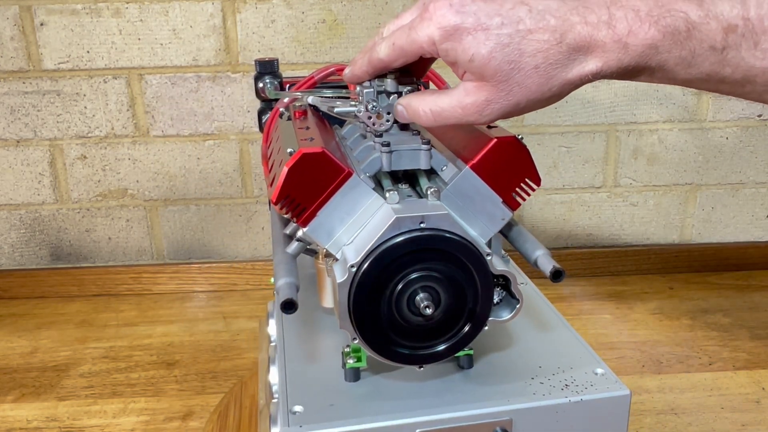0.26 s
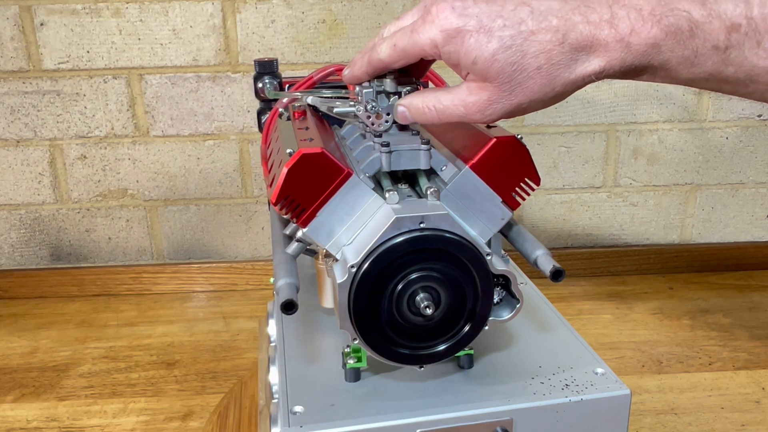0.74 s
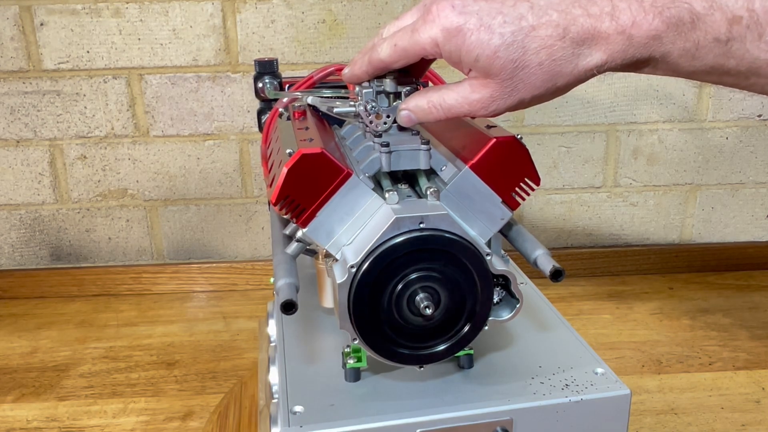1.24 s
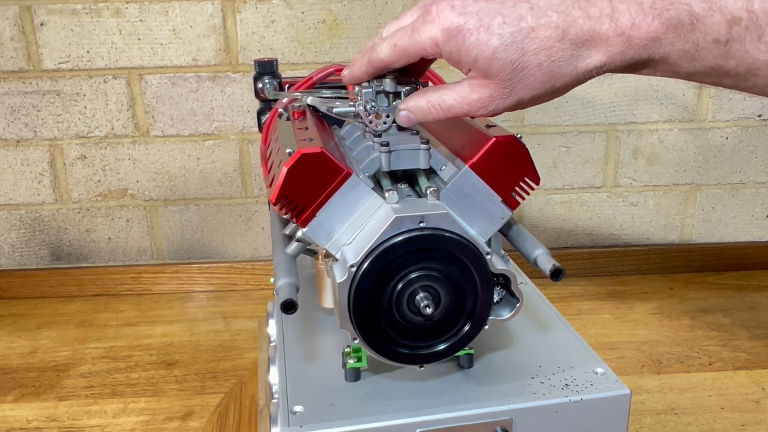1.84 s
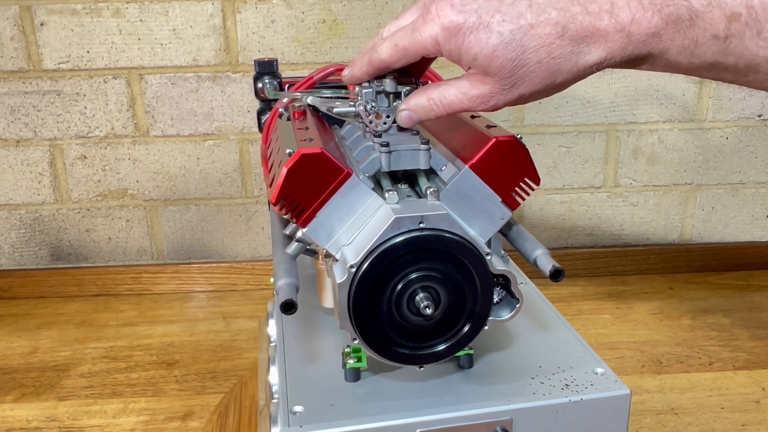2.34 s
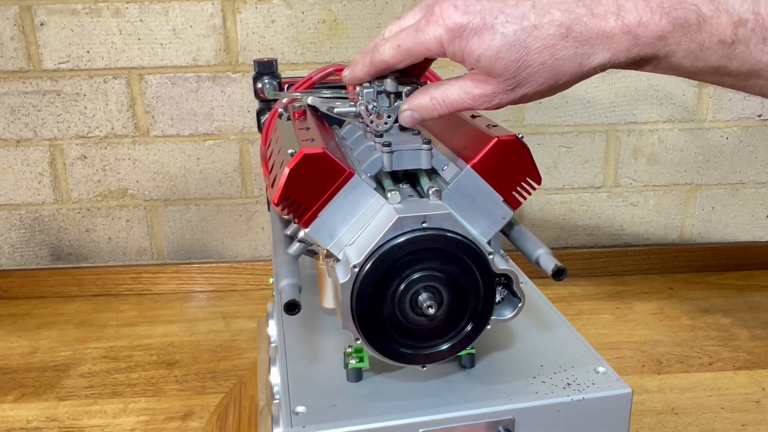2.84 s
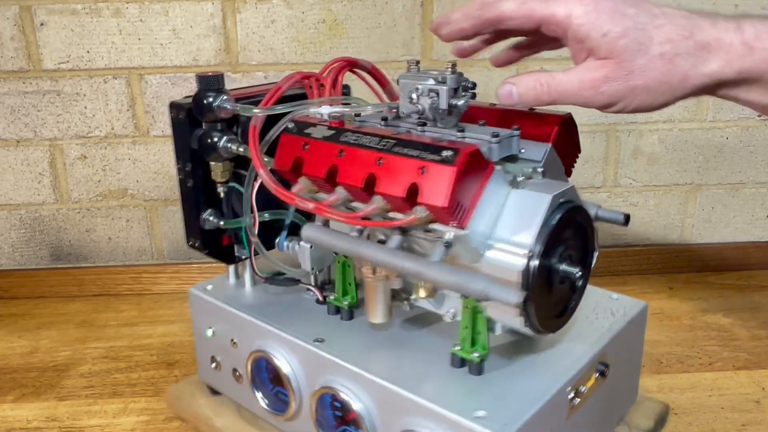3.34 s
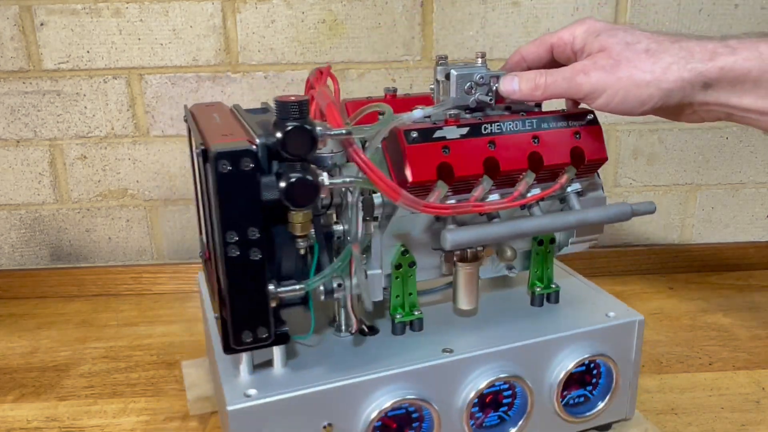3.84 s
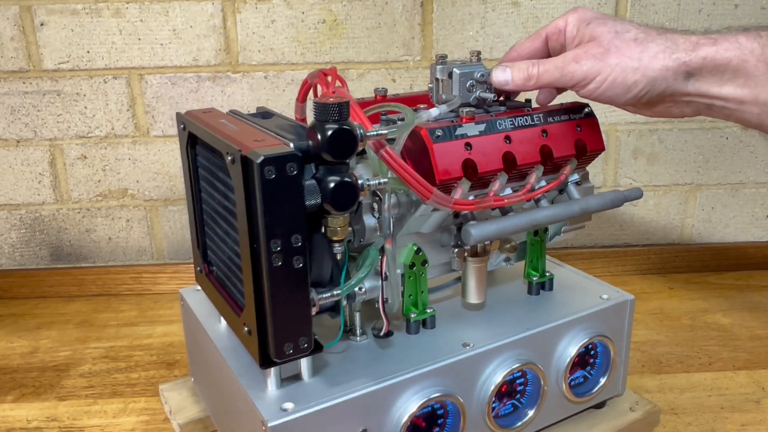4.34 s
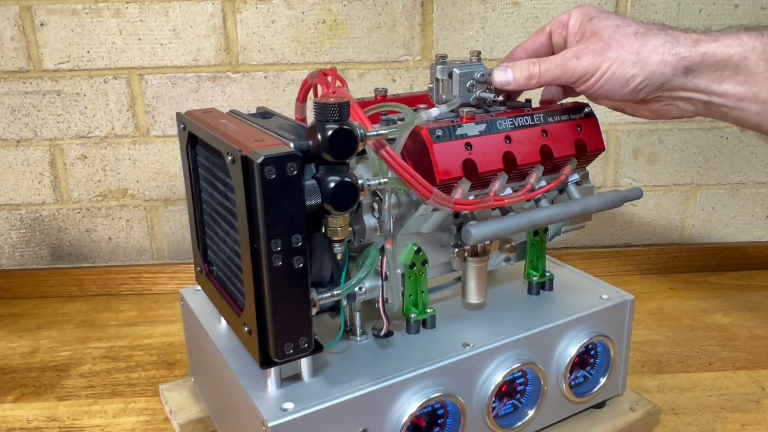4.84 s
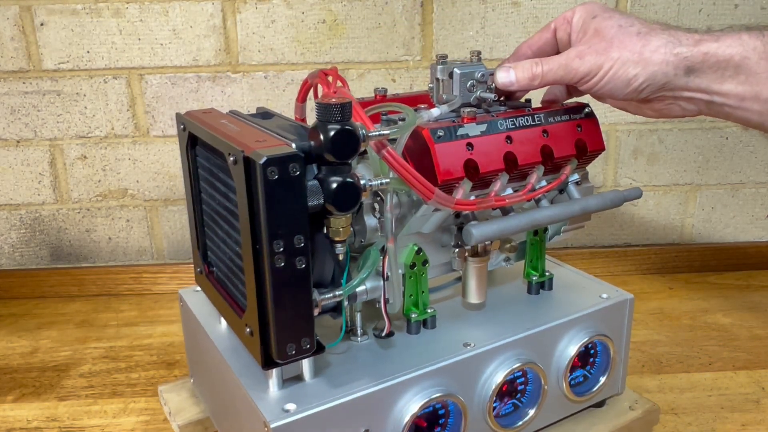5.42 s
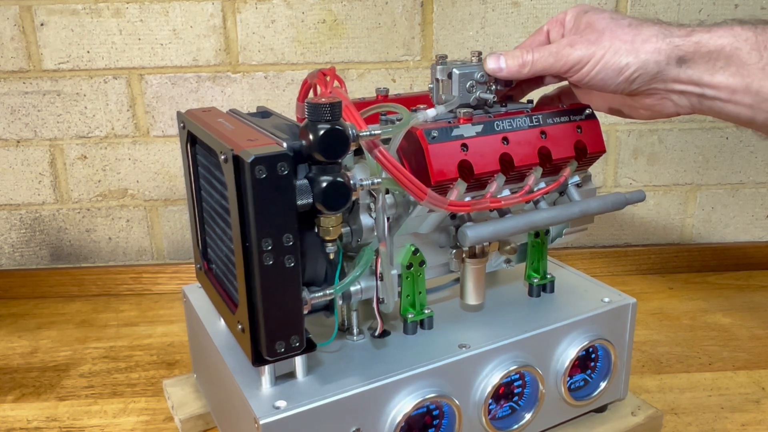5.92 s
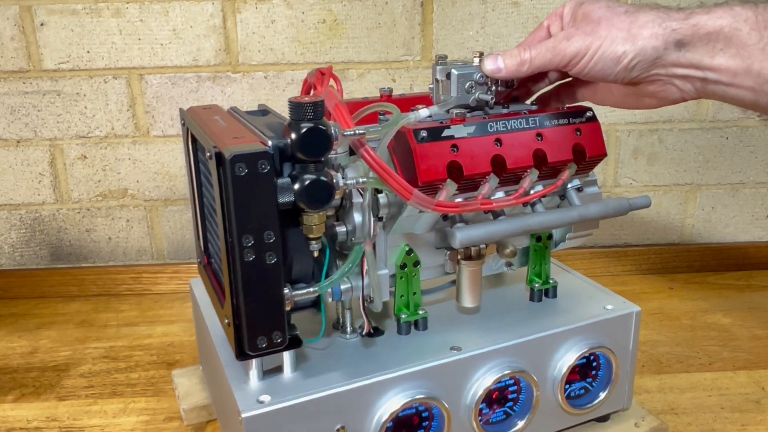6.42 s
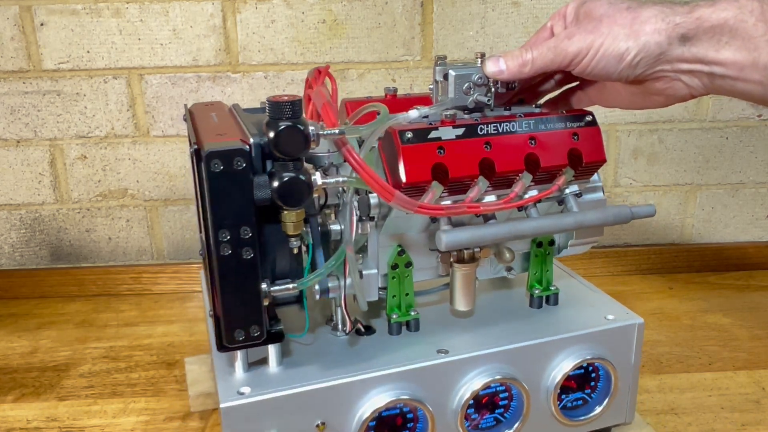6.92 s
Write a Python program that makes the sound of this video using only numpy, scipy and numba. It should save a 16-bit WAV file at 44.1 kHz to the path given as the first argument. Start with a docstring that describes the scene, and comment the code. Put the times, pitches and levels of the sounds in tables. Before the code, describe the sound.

Small brick room, phone very close to a model V8 on a metal stand. From 0 s the engine catches with hard dry cracks, hissing gas, hollow pipe thumps around 200-350 Hz and metallic ringing. A blip at 0.15-0.3 s shoots up and its clean tone slides down; another, densest in cracks, peaks near 0.73 s with a low thud around 0.8. From 1 to 1.9 s it misfires in short, weaker bursts. A lower rev swells at 1.9-2.2 s, then uneven putters fade until the stall at about 3.4 s. A soft rustle of the turning stand lasts to about 4.1 s over a very quiet, steady pump whine and faint air noise. At 4.9 s a bright starter rasp lasts about a tenth of a second; the engine refires, revving sharply at 5.15-5.3 s and falling. Exhaust now sounds blurred and softer; a smaller rev peaks near 6 s, then quick irregular puttering continues to the end, about 7.2 s.

```python
"""A scale-model V8 hunts and misfires on a metal stand in a small brick room, close to a phone.
Short runs of firings: each is a noise crack of gas, a pressure pop, a thump in the resonant pipes and a metal ring.
Between runs the strokes only pump air through the same pipes, and clean tones fall after throttle blips.
It stalls, leaving a small coolant pump whining in stacked sines over a soft rustle of the turning stand and
faint air noise, until a starter rasps in filtered noise and the engine turns again."""
import sys
import numpy as np
from scipy import signal
from scipy.fft import rfft, irfft, next_fast_len
from scipy.io import wavfile
from scipy.ndimage import uniform_filter1d
from numba import njit

SR = 44100
rng = np.random.default_rng(int(sys.argv[2]) if len(sys.argv) > 2 else 0)


def wav_out(sig):
    """Save sig, one row per channel (or a flat mono array), as 16-bit PCM at SR to the path in sys.argv[1]."""
    wavfile.write(sys.argv[1], SR, np.round(np.clip(np.atleast_2d(sig).T, -1, 1) * 32767).astype(np.int16))


N = 316197

# The pipes face the phone until this moment in seconds, then point away; paired settings are (facing, turned).
TURN_S = 4.
FACING = np.arange(N) < TURN_S * SR

# Resonances of the exhaust pipes. Each row: centre in Hz, width in Hz, relative level in dB.
PIPE = [(139.9, 43, -5), (190.7, 25, -0.5), (262, 45, 5.5), (341.6, 77.5, -0.5), (463.3, 72, -8.5),
        (760, 280, -10)]
# Resonances of the metal stand. Each row: centre in Hz, width in Hz, relative level in dB.
STAND = [(50, 2.8, -3.5), (97.5, 24, -6.5)]
# Runs in which the cylinders catch. Each row: start in seconds, length in seconds, relative level of the gas in dB,
# relative level of the pipes in dB, swell over the run in dB.
RUNS = [(0.0, 0.038, -47, -42.5, -5), (0.161, 0.11, -13, -17, 15.5), (0.574, 0.054, -25, -23.5, 4),
        (0.652, 0.064, -17.5, -16, 9.5), (0.716, 0.079, -19, -19, 6), (0.877, 0.089, -33, -27.5, -2.5),
        (1.002, 0.048, -37, -26.5, 3), (1.066, 0.036, -21, -23, 8), (1.151, 0.033, -34.5, -28, -1.5),
        (1.22, 0.074, -35.5, -31.5, -1.5), (1.355, 0.044, -30, -30, -2.5), (1.485, 0.044, -25, -28, -1),
        (1.569, 0.07, -30.5, -27.5, 0), (1.669, 0.049, -25, -25.5, 4.5), (1.769, 0.071, -32, -27.5, 3.5),
        (1.888, 0.251, -20.5, -20, 7.5), (2.165, 0.013, -15, -19.5, 10), (2.376, 0.033, -29, -26, 2),
        (2.497, 0.043, -32.5, -26.5, 0.5), (2.618, 0.054, -29, -26.5, 6.5), (2.762, 0.063, -31, -25, 4.5),
        (2.949, 0.043, -29, -23.5, 5), (3.099, 0.06, -38.5, -29.5, -0.5), (3.194, 0.019, -46, -36.5, -6.5),
        (3.271, 0.063, -41, -28.5, 1.5), (5.02, 0.058, -30.5, -26, 6.5), (5.156, 0.105, -22, -19, 7),
        (5.59, 0.04, -33, -29, 3), (5.757, 0.055, -35.5, -26.5, -1), (5.873, 0.023, -39, -33, -4.5),
        (5.936, 0.057, -36, -30.5, -1), (6.111, 0.063, -40.5, -30, 0.5), (6.19, 0.023, -36, -27.5, 1.5),
        (6.252, 0.039, -38.5, -30, 7.5), (6.305, 0.065, -34, -24.5, 3), (6.415, 0.06, -35, -22, 9),
        (6.56, 0.029, -27, -23, 11), (6.649, 0.068, -32, -27.5, 9), (6.746, 0.073, -34, -26, 2),
        (6.847, 0.055, -31, -24, 6), (6.934, 0.076, -40, -29, 0), (7.056, 0.056, -34.5, -28, -0.5),
        (7.16, 0.011, -25, -28.5, 9.5)]
# Extra level of the gas's high band. Each row: time in seconds, level in dB.
CRACK_TREBLE = [(0, -7.5), (1.0, 0.5), (2.2, -1.5), (3.0, 6), (3.4, 6.5), (5.0, 3.5), (5.5, -8), (5.8, 4),
                (7.17, 1.5)]


def undb(db):
    """Decibels to amplitude."""
    return 10 ** (np.asarray(db) / 20)


def unit(x):
    """Scale to an RMS of 1."""
    return x / np.sqrt(np.mean(x ** 2))


def curve(table):
    """Columns of a table that starts with seconds, joined by straight lines at every sample."""
    s, *columns = np.transpose(table)
    return [np.interp(np.arange(N) / SR, s, c) for c in columns]


def colour(x, points):
    """Equalise by (Hz, dB) points joined on a log frequency axis."""
    size = next_fast_len(x.shape[-1])
    hz, db = np.transpose(points)
    gain = undb(np.interp(np.log(np.fft.rfftfreq(size, 1 / SR) + 1), np.log(hz), db))
    return irfft(rfft(x, size) * gain, size)[..., :x.shape[-1]]


def ring(x, modes):
    """Sum of resonances, neighbours in opposite phase."""
    return sum((-1) ** k * undb(db) * signal.lfilter(*signal.iirpeak(hz, hz / width, SR), x)
               for k, (hz, width, db) in enumerate(modes))


def highpass(x, order, hz):
    """Butterworth low cut."""
    return signal.sosfilt(signal.butter(order, hz, "high", fs=SR, output="sos"), x)


def spikes(s, size):
    """Single-sample impulses at the given seconds."""
    out = np.zeros(N)
    np.add.at(out, np.clip((s * SR).astype(int), 0, N - 1), size)
    return out


def puff(x, rise_s, fall_s):
    """Turn every spike into a rounded rise and an exponential fall, peaking at the spike's size."""
    t = np.arange(SR // 10) / SR
    shape = (1 - np.exp(-t / rise_s)) ** 2 * np.exp(-t / fall_s)
    return signal.fftconvolve(x, shape / shape.max())[:N]


def walk(rate):
    """Random levels, one every 1 / rate seconds, joined by ramps; spread a little under 1."""
    k = int(SR / rate)
    held = np.repeat(rng.standard_normal(N // k + 1), k)
    return uniform_filter1d(held, k)[:N]


def engine():
    """Pumping strokes and firings share the pipes, gas escapes as noise, and the block shakes the stand."""
    # Pipes and gas between the runs. Each row: time in seconds, pumping in the pipes in dB, gas and valve hiss in dB.
    coasting = [(0.04, -58, -69), (0.14, -43.5, -54), (0.31, -31, -35), (0.55, -35, -44.5),
                (0.85, -32, -40.5), (1.14, -35, -57), (1.46, -33.5, -47), (1.86, -38.5, -54.5),
                (2.21, -28.5, -40), (2.48, -35.5, -53), (2.7, -37, -55.5), (2.93, -40, -60),
                (3.07, -37, -62.5), (3.38, -38.5, -54), (3.45, -66.5, -46), (3.9, -79, -55.5),
                (4.92, -68.5, -51.5), (4.95, -47, -57), (5.0, -39.5, -40.5), (5.13, -31, -37.5),
                (5.31, -27.5, -32.5), (5.56, -35, -39.5), (5.72, -39.5, -44), (6.0, -29, -45),
                (6.25, -45, -61), (6.4, -33, -45), (6.8, -30, -45.5), (7.17, -32, -43)]
    still = [(4.15, -120, -120), (4.9, -120, -120)]
    coast_db, leak_db = curve(sorted(coasting + still))

    # steady part of a run against its listed levels, and how fast it dies
    run_pumping_db, run_hiss_db = (-6, -5), (-7.5, -1.5)
    gas_fall_db_s, pipes_fall_db_s = 701, 297
    gas_db = runs(np.transpose(RUNS)[2], gas_fall_db_s)
    pipes_db = runs(np.transpose(RUNS)[3], pipes_fall_db_s)
    pump_level = np.hypot(undb(coast_db), undb(pipes_db + np.where(FACING, *run_pumping_db)))
    hiss_level = np.hypot(undb(leak_db), undb(gas_db + np.where(FACING, *run_hiss_db)))

    stroke, times, hz = strokes()
    s, crack_db, thump_db = firings(times, hz, pipes_db)
    # hiss and overtone die as the crank slows to a stop
    turning = np.clip(speed()[0] / 100, 0, 1) ** 4
    hiss = gas_hiss(stroke, hiss_level * turning)
    pumped = (pumping(stroke, turning) + coast_tones()) * pump_level
    shaken = shake(stroke) * uniform_filter1d(pump_level, size=SR // 10)
    escaping = gas(np.hypot(cracks(s, crack_db), hiss))
    mono = pumped + thumps(s, thump_db) + shaken + rock() + jolts() + metal(s, crack_db, hiss[0]) + pops(s, crack_db)
    return mono + escaping


def speed():
    """Strokes a second, roughness and share of clean tone: idle, or a blip that climbs and sags at a steady rate."""
    # Idle of all eight cylinders. Each row: time in seconds, exhaust strokes in Hz before random surges, roughness in dB.
    idle = [(0, 116.3, 6), (.56, 138.8, 4), (.9, 188.2, 5), (1.88, 130.8, 5.5), (2.35, 139.5, 4),
            (3.3, 120.4, 4), (3.45, 50.75, 2), (4.9, 45.04, 3), (4.98, 109.6, 3), (5.15, 149.6, 4.5),
            (5.56, 105, 4), (5.75, 110.9, 4), (6.1, 139.6, 4), (6.4, 199.4, 4), (7.17, 186.3, 4.5)]
    # Throttle blips. Each row: opens in seconds, top reached in seconds, closes in seconds, top strokes in Hz,
    # roughness while open in dB, roughness once shut in dB, clean tones once shut in dB.
    revs = [(.14, .28, .305, 400, 3, 2.5, 0), (.56, .73, .73, 362, 6, 4, -20),
            (1.88, 2.1, 2.2, 255, 5, 4, -12), (5.15, 5.26, 5.27, 400, 5, 3, 0),
            (5.75, 5.97, 5.97, 258, 5.5, 4, -12)]
    sag_hz_per_s = 1050
    t = np.arange(N) / SR
    hz, rough_db = curve(idle)
    smooth = np.zeros(N)
    for opens, top, closes, top_hz, blip_db, sag_db, clean_db in revs:
        climb = np.interp(t, [opens, top], [hz[int(opens * SR)], top_hz])
        blip = climb - sag_hz_per_s * np.maximum(t - closes, 0)
        on = (t > opens) & (blip > hz)
        shut = t > closes
        hz = np.where(on, blip, hz)
        rough_db = np.where(on, np.where(shut, sag_db, blip_db), rough_db)
        smooth = np.where(on & shut, undb(clean_db), smooth)
    return hz, rough_db, smooth


def strokes():
    """A spike at every exhaust stroke; the rougher the running, the more cylinders, sizes and timing differ."""
    # Uneven banks, one cylinder after another in firing order. Each value: a share of the roughness.
    cylinder_shares = [-0.54, -0.2, -0.08, 0.5, 0.06, -3.5, -0.14, -1.22]
    hz, rough_db, _ = speed()
    hz = hz * (1 + .004 * rough_db * rough_db * walk(14))  # misfires make the speed surge and sag
    at = np.flatnonzero(np.diff(np.floor(np.cumsum(hz) / SR)))
    chance = np.clip(rng.standard_normal((N // 50, 2))[:len(at)].T, -1.7, 1.7)
    size_db = rough_db[at] * (np.resize(cylinder_shares, len(at)) + chance[0])
    s = at / SR + .007 * rough_db[at] ** 2 * chance[1] / hz[at]
    # quicker strokes overlap, so each is smaller for the same loudness
    return spikes(s, undb(size_db) / np.sqrt(hz[at])), s, hz[at]


def runs(level_db, fall_db_s):
    """Level in dB of the strongest run: on at once, swelling, then falling away."""
    t = np.arange(0, N / SR, .001)[:, None]
    start, length, *_, swell_db = np.transpose(RUNS)
    swelling = swell_db * np.maximum(1 - (t - start) / length, 0)
    falling = fall_db_s * np.maximum(t - start - length, 0)
    db = np.maximum(level_db - swelling - falling, -120)
    db = np.where(t < start, -120, db).max(axis=1)
    return np.interp(np.arange(N) / SR, t[:, 0], db)


def firings(s, hz, pipes_db):
    """Times, crack dB and thump dB: a run opens with a firing, strokes fire unevenly; single firings are listed."""
    # Single firings at set times, loud and soft. Each row: time in seconds, relative level of the gas crack in dB.
    single_firings = [(.238, -6), (.257, -7.5), (.275, -11.5), (0.294, -6), (0.587, -17.5), (0.669, -9.5),
                      (0.6999, -13.5), (0.7212, -10.5), (0.723, -6.5), (0.741, -12.5), (0.7588, -5),
                      (0.7642, -8), (0.781, -9), (0.7995, -5.5), (0.8247, -9), (0.8743, -14),
                      (0.898, -15.5), (0.91, -22.5), (0.9262, -17.5), (.9514, -19.5), (0.9347, -12),
                      (0.965, -16.5), (0.977, -17), (1.0073, -16.5), (1.016, -12.5), (1.0412, -16.5),
                      (1.083, -18), (1.096, -16.5), (1.105, -19.5), (1.1655, -13.5), (1.2222, -23.5),
                      (1.2637, -16.5), (1.288, -28.5), (1.378, -24), (1.486, -20), (1.4975, -19),
                      (1.5182, -16.5), (1.573, -15.5), (1.5797, -23), (1.633, -27), (1.6725, -20.5),
                      (1.695, -15), (1.773, -18.5), (1.8, -25.5), (1.8194, -13.5), (1.9002, -29),
                      (1.9177, -24.5), (1.923, -15.5), (1.9761, -15.5), (2.005, -9), (2.0455, -10),
                      (2.0524, -14.5), (2.0897, -16.5), (2.1048, -15.5), (2.123, -7.5), (2.175, -9),
                      (2.1851, -11), (2.3858, -21.5), (2.4043, -22), (2.5016, -24), (2.519, -20),
                      (2.5331, -22), (2.5875, -31), (2.6277, -23), (2.645, -28), (2.6511, -21.5),
                      (2.659, -22), (2.6716, -22), (2.7387, -35.5), (2.773, -23.5), (2.7923, -19.5),
                      (2.8045, -20), (2.8177, -22), (2.97, -26), (2.9786, -15.5), (2.9962, -25.5),
                      (3.0805, -34.5), (3.112, -24.5), (3.1387, -29.5), (3.148, -24), (3.191, -35),
                      (3.208, -29), (3.235, -36.5), (3.276, -34), (3.2933, -23.5), (3.312, -21),
                      (3.321, -36), (3.329, -25), (5.034, -24.5), (5.0443, -27.5), (5.0654, -30.5),
                      (5.08, -33), (5.091, -26), (5.219, -18.5), (5.616, -30), (5.7776, -25.5),
                      (5.7888, -25), (5.9459, -22), (5.9562, -28.5), (5.985, -21), (6.146, -30.5),
                      (6.2023, -30), (6.2859, -34.5), (6.3557, -21.5), (6.4254, -25), (6.466, -20),
                      (6.5403, -31.5), (6.5846, -25.5), (6.652, -29.5), (6.6953, -17.5), (6.756, -26.5),
                      (6.787, -22.5), (6.794, -25.5), (6.8511, -26.5), (6.8808, -27), (6.942, -20),
                      (6.9547, -25.5), (6.985, -23), (7.0576, -27), (7.0758, -45), (7.103, -22.5),
                      (7.1663, -18)]
    crack_boost_db, thump_boost_db, first_db, single_thump_db = 11, 6.5, -5.5, 5.5
    first_lag_s = .001
    # random cracks fall short of their run's full level by a random amount, thumps vary less
    scatter_db, thump_scatter_db = 6, 2
    firing_share = (.45, .1)  # share of the strokes heard to crack
    start, length, gas_db, run_db, swell_db = np.transpose(RUNS)
    single, single_db = np.transpose(single_firings)
    listed = np.append(start + first_lag_s, single)

    inside = (s[:, None] > start) & (s[:, None] < start + length)
    fires = rng.random(N // 50)[:len(s)] < np.where(s < TURN_S, *firing_share)
    # strokes within 4 ms of a listed firing give way to it
    free = inside.any(axis=1) & (np.abs(s[:, None] - listed).min(axis=1) > .004)
    short_db = scatter_db * rng.exponential(size=N // 50)[:len(s)]
    vary_db = thump_scatter_db * rng.standard_normal(N // 50)[:len(s)]
    swell = (inside * swell_db * ((s[:, None] - start) / length - 1)).sum(axis=1)
    swell = swell - 10 * np.log10(hz / 130)  # quicker strokes are smaller
    which = inside.argmax(axis=1)
    crack_db = np.where(free & fires, gas_db[which] + crack_boost_db + swell - short_db, -120)
    thump_db = np.where(free, run_db[which] + thump_boost_db + swell + vary_db, -120)

    first_crack_db = gas_db - swell_db + first_db
    first_thump_db = run_db - swell_db + thump_boost_db
    single_thumps = pipes_db[(single * SR).astype(int)] + single_thump_db
    return (np.append(listed, s), np.concatenate([first_crack_db, single_db, crack_db]),
            np.concatenate([first_thump_db, single_thumps, thump_db]))


def cracks(s, crack_db):
    """Envelopes of the gas jets, low band to high; pointing away they come round the block, blurred."""
    tint_db = 3. * rng.standard_normal((N // 50, 3))[:len(s)]  # each crack has its own colour
    tint_db[:, 2] += np.interp(s, *np.transpose(CRACK_TREBLE))
    out = []
    for db in tint_db.T:
        jets = spikes(s - .0012, undb(crack_db - 6.0 + db))
        sharp = puff(jets, .002, .0008)
        blurred = undb(-3) * puff(jets, .003, .0034)
        tail = undb(-17.5) * puff(jets, 0.024, 0.0031)
        out.append(np.where(FACING, sharp, blurred) + tail)
    return out


def gas_hiss(stroke, level):
    """Envelopes of the leaking gas in three bands, gusting with every stroke and flickering at random."""
    gust = stroke ** .5
    gusts = np.where(FACING, unit(puff(gust, .0007, .001)), unit(puff(gust, .002, .003)))
    hiss = unit(0.86 + gusts) * level * undb(0.61 * walk(40))
    return np.array([hiss, hiss, hiss * undb(curve(CRACK_TREBLE)[0])])


def gas(envelopes):
    """Turbulent noise in three bands, coloured by where the pipes point; the two banks differ left to right."""
    # Colour of the gas while the pipes face the phone. Each row: frequency in Hz, density in dB per Hz.
    facing_colour = [(290, -2.5), (500, -4.5), (1890, -11.5), (3670, -16), (8130, -10), (10100, -7.5),
                     (11700, -5.5), (13700, -9), (15800, -13)]
    # Colour once they point away. Each row: frequency in Hz, density in dB per Hz.
    turned_colour = [(290, 11), (500, 0.5), (1420, 0), (2800, -6), (3900, -9.5), (6000, -9), (8610, -0.5),
                     (10100, -5.5), (11500, 1), (13900, -3.5), (15800, -6)]
    # How far the two banks of pipes sound apart. Each row: frequency in Hz, side against mid in dB.
    bank_width = [(800, -8.5), (2800, 0.5), (5000, -0.5), (9000, -13.5)]
    noise = rng.standard_normal((2, N))
    below = [signal.sosfilt(signal.butter(1, hz, fs=SR, output="sos"), noise) for hz in (2800, 6500)]
    bands = below[0], below[1] - below[0], noise - below[1]
    mid, side = sum(e * band for e, band in zip(envelopes, bands))
    both = mid + colour(side, bank_width) * np.array([[1], [-1]])
    # divide by the loudness of plain noise in the same colour
    facing, turned = [colour(both, points) / np.std(colour(noise[0], points))
                      for points in (facing_colour, turned_colour)]
    return np.where(FACING, facing, turned)


def pops(s, crack_db):
    """The short pressure spike of each firing, just after its gas noise begins."""
    pop_db = (-6, -8)  # against its crack
    push = puff(spikes(s + .0006, -undb(crack_db + np.where(s < TURN_S, *pop_db))), .0001, .00012)
    return highpass(push, 1, 500)


def thumps(s, thump_db):
    """The pressure wave of each firing rings the pipes and leaves them just after the first jet of gas."""
    turned_db = -3
    # peak of a single reference thump
    one = np.abs(ring(puff(spikes(np.zeros(1), 0.87), 0.0002, 0.00037), PIPE)).max()
    push = spikes(s + .0017, undb(thump_db - 4.0 + (s > TURN_S) * turned_db))
    return ring(puff(push, 0.00057, 0.0006), PIPE) / one


def pumping(stroke, turning):
    """Strokes without fire push air through the pipe resonances, with a broad overtone while the crank turns."""
    low = unit(ring(puff(stroke, .0001, 0.001), PIPE))
    overtone = unit(ring(puff(stroke, .0001, .0002), [(650, 400, 0)])) * undb(-12)
    return low + overtone * turning


def coast_tones():
    """With the throttle shut, falling sines at multiples of the stroke rate come out clean."""
    # Tones of crank and intake. Each row: multiple of the stroke rate, dB against the pumping facing, the same turned.
    tone_levels = [(.5, -11, -12), (.625, -17, -4), (.75, -12, -5), (1, -3, -7), (1.25, -13, -11),
                   (1.5, -14, -15), (2, -11, -20)]
    fade_s = 0.022
    hz, _, smooth = speed()
    turn = 2 * np.pi * np.cumsum(hz) / SR
    tones = sum(undb(np.where(FACING, *db) + 3.9 * walk(25)) * np.sin(k * turn) for k, *db in tone_levels)
    return tones * uniform_filter1d(smooth, size=int(fade_s * SR))


def metal(s, crack_db, hiss):
    """Every firing rings the pipes and covers in a different mix, longer once the jets come round the block."""
    # Resonances of the metal. Each row: centre in Hz, width in Hz, relative level facing in dB, the same turned in dB.
    metal_modes = [(1330, 75, 5, 7), (2000, 80, 2, -2), (2600, 350, -4, 0), (5050, 220, -2, -9),
                   (3250, 200, -4, -6), (8250, 600, .6, -1), (11220, 500, .6, -1), (930, 130, -2, 0),
                   (6800, 300, -5, -9)]
    ring_db, hum_db = (-4, -2), (1, 2)  # ring against the crack, hum against the hiss
    jet_db = crack_db + np.where(s < TURN_S, *ring_db)
    mix_db = jet_db[:, None] + 9 * (rng.random((N // 50, len(metal_modes)))[:len(s)] - .5)
    hum = hiss * undb(np.where(FACING, *hum_db))
    out = 0
    for k, (hz, width, *db) in enumerate(metal_modes):
        jets = spikes(s - .0007, undb(mix_db[:, k]))
        strike = np.where(FACING, puff(jets, .0007, .0013), puff(jets, .002, .0045))
        drive = np.hypot(strike, hum) * rng.standard_normal(N)
        out = out + ring(drive, [(hz, width, 0)]) * undb(np.where(FACING, *db))
    return out


def shake(stroke):
    """Strokes and a little noise shake the block on the low resonances of the stand."""
    # Strength of the shaking. Each row: time in seconds, level against the pumping in dB.
    shake_levels = [(0, -7.5), (3.4, -7), (5.0, -22), (5.5, -14), (6.0, -5), (7.17, -5)]
    drive = unit(stroke) + 0.13 * rng.standard_normal(N)
    return unit(ring(drive, STAND)) * undb(curve(shake_levels)[0])


def rock():
    """The stand rocks on after the stall: noise in its lowest resonance, dying away."""
    stall_s, rock_db, fall_db_s = 3.44, -46, 68
    since = np.arange(N) / SR - stall_s
    level = (since > 0) * undb(rock_db - fall_db_s * np.abs(since))
    return level * unit(ring(rng.standard_normal(N), STAND[:1]))


def jolts():
    """The block lurches on its stand: soft low thuds through a broad resonance."""
    # Lurches of the block. Each row: time in seconds, relative peak in dB.
    lurches = [(0.261, -41.5), (0.654, -38), (.81, -21), (1.09, -43.5), (2.099, -38), (5.47, -37)]
    # Resonance of a thud. Each row: centre in Hz, width in Hz, level in dB.
    thud_modes = [(58, 28, 0)]
    s, peak_db = np.transpose(lurches)

    def thud(at, size):
        return ring(puff(spikes(at, size), 0.0045, 0.0036), thud_modes)

    return thud(s, undb(peak_db)) / np.abs(thud(np.zeros(1), 0.62)).max()


def starter():
    """The pinion rasps against the flywheel: flickering noise through the gear resonances."""
    # Loudness of the rasp. Each row: time in seconds, level in dB.
    rasp_levels = [(4.87, -75), (4.895, -43), (4.93, -33), (4.972, -31), (4.985, -37), (5.012, -45)]
    # Resonances of the gears. Each row: centre in Hz, width in Hz, relative level in dB.
    gear_modes = [(2800, 450, -7), (4400, 900, -9), (6500, 1200, -11), (8650, 300, 1), (11500, 800, -6)]
    level_db, = curve([(4.86, -120)] + rasp_levels + [(5.05, -120)])
    rasp = rng.standard_normal(N) * undb(0.96 * walk(300) + 3.5 * walk(60))
    return unit(unit(ring(rasp, gear_modes)) + 0.31 * rasp) * undb(level_db)


def pump():
    """A small motor's whine of stacked sines, changing colour as the stand turns; sets of multiples waver alone."""
    # Multiples 1, 2, 3 .. of the pump's turn. Each row: relative level in dB before the stand turns, the same after.
    multiples = [(-2.0, -0.5), (-13.5, -31.5), (-12.5, -9.0), (-5.0, -6.5), (-12.5, -13.5), (-15.0, -12.5),
                 (-8.0, -24.0), (-14.5, -20.0), (0.0, -1.5), (-10.0, -5.0), (-9.5, -14.5), (-16.5, -13.5),
                 (-17.5, -15.5), (-6.5, 0.0), (-2.5, -3.0), (-7.0, -10.5), (-7.0, -21.0), (-8.0, -14.5),
                 (-17.5, -18.0), (-10.5, -14.0), (-21.0, -20.0), (-12.0, -6.0), (-16.5, -12.5),
                 (-22.5, -20.0), (-20.0, -24.0), (-12.5, -27.0), (-14.5, -13.0), (-8.0, -4.0),
                 (-23.0, -22.0), (-19.0, -24.0), (-26.0, -20.0), (-17.0, -23.5), (-30.5, -29.5),
                 (-32.5, -25.5), (-29.0, -30.0), (-26.5, -18.0), (-21.5, -19.5), (-22.0, -21.0),
                 (-27.0, -22.0), (-11.0, -20.5), (-22.0, -15.5), (-16.5, -5.5), (-21.5, -20.5),
                 (-21.5, -18.5), (-12.5, -15.0), (-22.0, -17.0), (-35.5, -24.5), (-25.0, -14.5),
                 (-22.0, -18.0), (-16.0, -11.0)]
    # Loudness of the whine. Each row: time in seconds, level in dB.
    whine_levels = [(3.4, -59), (3.7, -59.5), (4.0, -60), (4.9, -58.5)]
    # Where the tones sit. Each row: frequency in Hz, left against right in dB.
    whine_pan = [(150, 1), (450, -7), (700, 3.5), (1400, -4), (2800, -3), (5500, 2.5), (9000, 0)]
    pump_hz, turn_span_s = 151.67, (3.75, 4.15)
    # above the listed multiples the last ones repeat, ever weaker
    top, repeated, fall_db = 102, 14, -5.5
    k = np.arange(1, top + 1)
    rounds = np.maximum(0, (k - len(multiples) - 1) // repeated + 1)
    sizes = undb(np.transpose(multiples)[:, k - 1 - repeated * rounds] + fall_db * rounds)

    # one turn of the waveform is tabulated, then read at the wavering speed
    grid = np.linspace(0, 1, 4097)
    start = rng.random((len(k), 1))
    turn = np.cumsum(pump_hz * (1 + 0.000088 * walk(3.3))) / SR % 1
    place = (turn * 4096).astype(int)
    turned = np.interp(np.arange(N) / SR, turn_span_s, [0, 1])
    waver = [undb(2.6 * walk(4) + 1.5 * walk(45)) for _ in range(9)]
    ears = []
    # the listed multiples reach the right ear with a phase lag, in cycles
    for late in (0 * k, np.minimum(.015 * k, .17) * (k <= len(multiples))):
        waves = np.sin(2 * np.pi * (k[:, None] * grid + start - late[:, None]))
        sets = [sizes[:, j::len(waver)] @ waves[j::len(waver)] for j in range(len(waver))]
        ears.append(sum(gain * ((1 - turned) * before[place] + turned * after[place])
                        for gain, (before, after) in zip(waver, sets)))
    ears = [colour(ear, np.array(whine_pan) * [1, side]) for ear, side in zip(ears, (.5, -.5))]
    return unit(np.array(ears)) * undb(curve(whine_levels)[0])


def slide():
    """Soft rustle of the stand sliding round on the bench: coloured noise with a fluttering level."""
    # Strength of the rustle. Each row: time in seconds, level in dB before the flutter.
    rustle_levels = [(3.38, -80), (3.45, -66), (3.6, -72), (3.8, -75), (3.95, -85), (4.1, -95)]
    # Colour of the rustle. Each row: frequency in Hz, gain in dB.
    rustle_colour = [(120, -10), (300, 0), (1300, -8), (2500, -14), (5000, -34)]
    rustle = unit(colour(rng.standard_normal((2, N)) + rng.standard_normal(N), rustle_colour))
    level_db = curve([(3.3, -120)] + rustle_levels + [(4.2, -120)])[0]
    return rustle * undb(level_db + 2.5 * walk(45))


@njit
def walls(x, lags, gain, damp):
    """Eight delay lines that feed each other, duller on every round."""
    line, soft, out = np.zeros((8, 4096)), np.zeros(8), np.zeros((2, len(x)))
    for i in range(len(x)):
        total = 0.
        for k in range(8):
            soft[k] += (1 - damp) * (gain[k] * line[k, (i - lags[k]) & 4095] - soft[k])
            total += soft[k]
            out[k % 2, i] += soft[k]
        for k in range(8):
            line[k, i & 4095] = x[i] + soft[k] - total / 4
    return out


def room(near):
    """The small brick room: engine and starter, low end thinned, echo between the walls."""
    t60_s, damp, level_db = 0.3, 0.45, -15  # decay time before the damping shortens it
    lags = rng.integers(300, 1800, 8)  # samples
    mid = np.mean(near, axis=0)
    bright, body = highpass(mid, 2, 450), highpass(mid, 2, 170)
    echo = walls(bright + 0.52 * body, lags, undb(-60 * lags / SR / t60_s), damp)
    echo = echo * np.std(echo) / np.std(echo, axis=1, keepdims=True)  # even left and right
    return undb(level_db) * echo


def air():
    """Faint steady background noise, independent left and right."""
    # Colour of the background. Each row: frequency in Hz, gain in dB.
    air_colour = [(30, -5.5), (90, 5), (400, -8), (1500, -5), (16000, -11)]
    return unit(colour(rng.standard_normal((2, N)), air_colour)) * undb(-74.5)


def scene():
    """Engine and starter with their room, over the pump, the sliding stand and the air."""
    near = engine() + starter()
    return near + room(near) + pump() + slide() + air()


def record(dry):
    """The treble reaches the two ports by unequal paths; the left port is louder in the mids; peaks are rounded."""
    port_lag_s, port_hz, port_even_hz = .000267, 6500, 8150  # phases agree at the last frequency
    shelf_hz, top_hz = 15800, 16700
    size = next_fast_len(N)
    hz = np.fft.rfftfreq(size, 1 / SR)
    lead = 2 * np.pi * port_lag_s * (hz - port_even_hz) * np.clip((hz - port_hz) / 840.0, 0, 1)
    right = irfft(rfft(dry[1], size) * np.exp(1j * lead), size)[:N]
    left = colour(dry[0], [(300, .8), (2400, 3.5), (5500, 4), (7500, -.1)])
    rounded = np.tanh(np.array([left, right]))
    both = colour(rounded, [(24, -28), (44, 0), (shelf_hz, 0), (shelf_hz + 120, -22)])
    return signal.sosfilt(signal.ellip(10, .2, 90, top_hz, fs=SR, output="sos"), both)


dry = scene()
out = record(dry)
wav_out(out)
```